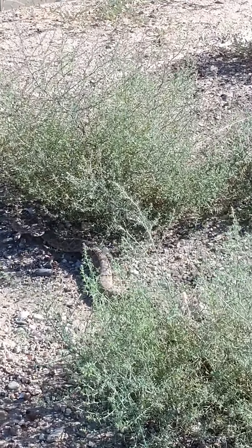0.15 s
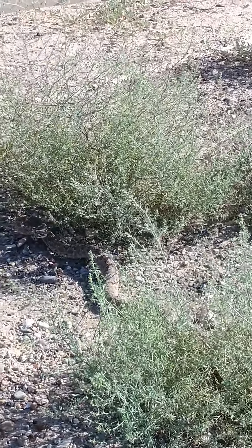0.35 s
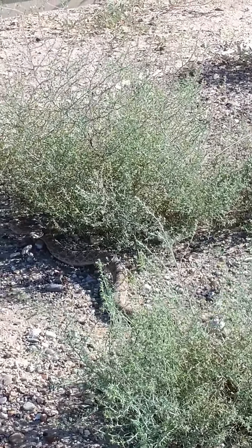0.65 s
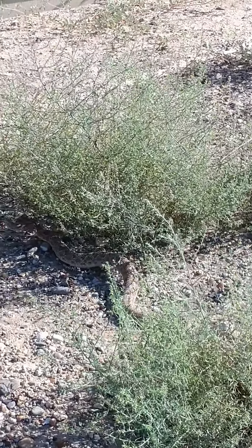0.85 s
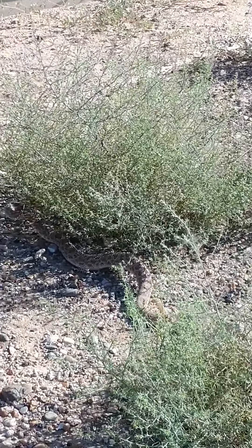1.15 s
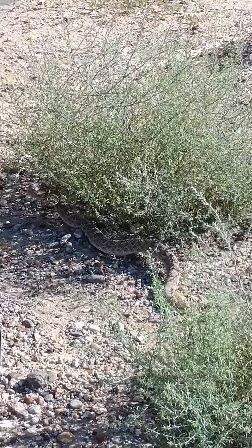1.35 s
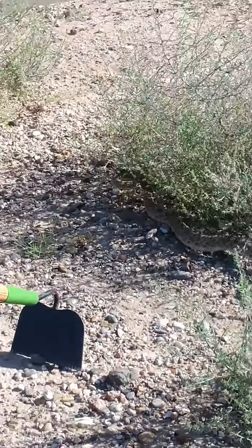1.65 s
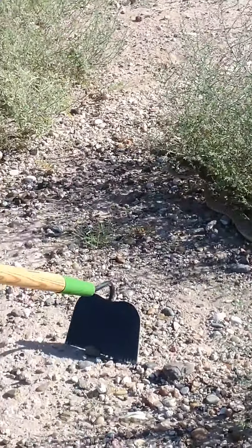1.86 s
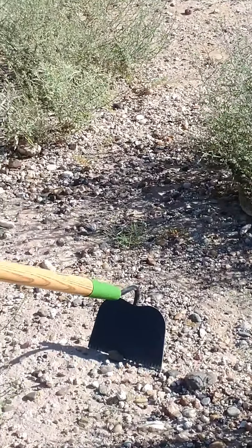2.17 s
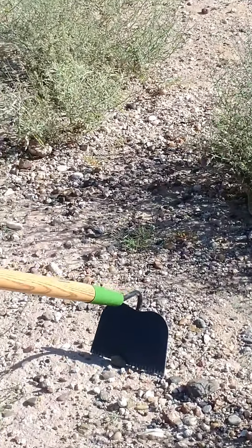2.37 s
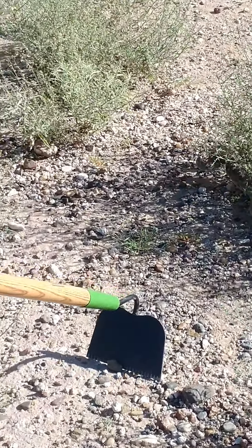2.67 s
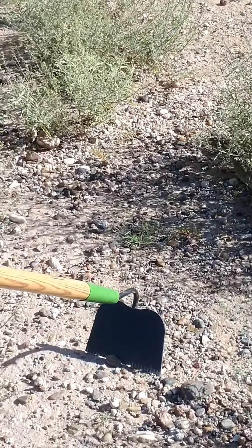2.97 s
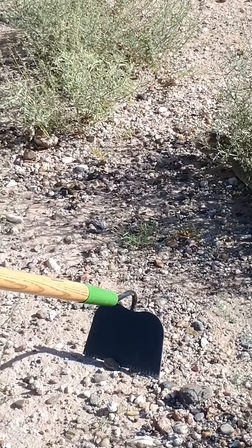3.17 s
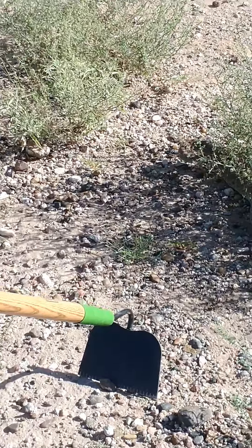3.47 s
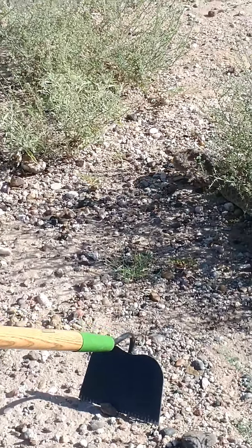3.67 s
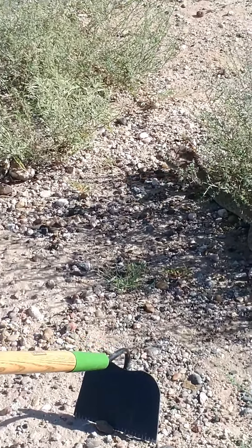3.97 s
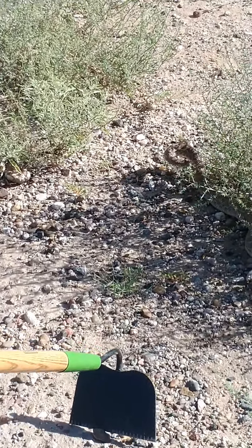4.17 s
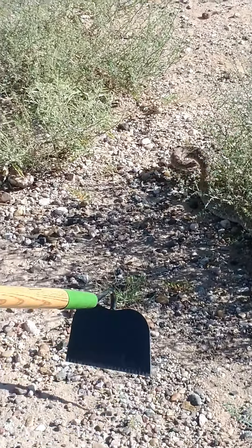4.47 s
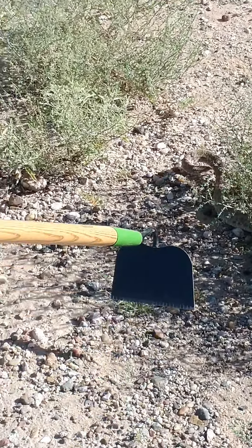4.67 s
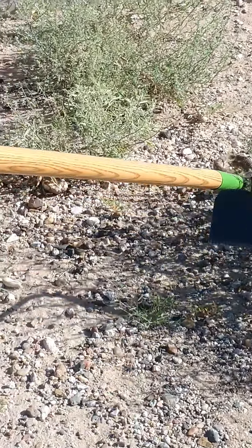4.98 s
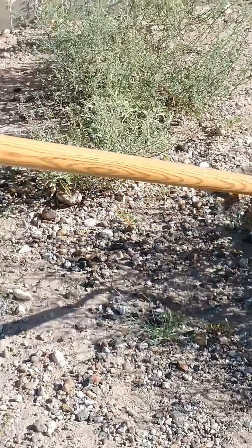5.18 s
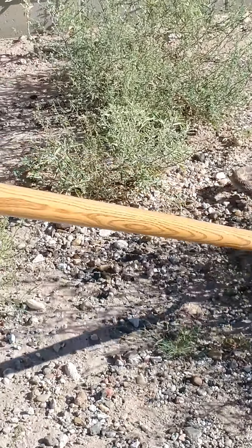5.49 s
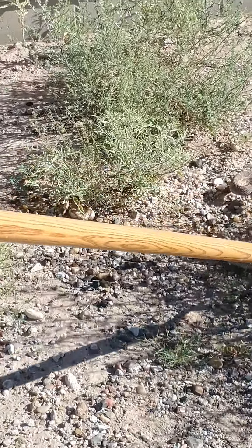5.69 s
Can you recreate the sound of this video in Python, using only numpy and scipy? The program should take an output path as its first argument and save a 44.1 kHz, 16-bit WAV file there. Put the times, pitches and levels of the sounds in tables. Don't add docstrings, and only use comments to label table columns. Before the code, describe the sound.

Continuous bright, sizzling snake rattle outdoors, rising and dipping in strength, with small pebble knocks, soft thuds and faint grit underfoot.

```python
import sys
import numpy as np
from scipy import signal
from scipy.fft import rfft, irfft, next_fast_len
from scipy.io import wavfile
from scipy.ndimage import uniform_filter1d

SR = 44100
rng = np.random.default_rng(int(sys.argv[2]) if len(sys.argv) > 2 else 0)


def how_loud(loudness_db):
    steps = np.asarray(loudness_db, float) / 20
    return 10 ** steps


def file_out(sig):
    cols = np.atleast_2d(sig).T
    lim = np.clip(cols, -1, 1)
    pcm = np.round(lim * 32767).astype(np.int16)
    wavfile.write(sys.argv[1], SR, pcm)


N = 257390
T = np.arange(N) / SR

SNAKE_LAG = 10
EDGE_LAG = 3
PAN_DB = 5.5


def unit(x):
    return x / np.sqrt(np.mean(x ** 2))


def band(x, hz, width, order=1):
    edges = [max(hz - width / 2, 20), min(hz + width / 2, 0.49 * SR)]
    return signal.sosfilt(signal.butter(order, edges, "band", fs=SR, output="sos"), x)


def high_pass(x, order, hz):
    return signal.sosfilt(signal.butter(order, hz, "high", fs=SR, output="sos"), x)


def ring(x, modes):
    out = 0
    for k, (hz, width, db) in enumerate(modes):
        out = out + (-1) ** k * how_loud(db) * band(x, hz, width)
    return out


def walk(rate):
    hold = int(SR / rate)
    steps = np.repeat(rng.standard_normal(N // hold + 1), hold)
    return 1.97 * uniform_filter1d(uniform_filter1d(steps, hold), hold)[:N]


def late(x, samples):
    return np.concatenate([np.zeros(samples), x[:N - samples]])


def curve(table):
    return np.interp(T, *np.transpose(table))


def arch(start, length):
    return np.sin(np.pi * np.clip((T - start) / length, 0, 1))


def swells(rows, rest_db):
    gain = how_loud(rest_db)
    for start, length, db in rows:
        gain = gain + how_loud(db) * np.sqrt(abs(arch(start, length)))
    return gain


def grains(spread_db):
    size = np.minimum(rng.exponential(size=N), 6)
    return unit(rng.standard_normal(N) * how_loud(spread_db * size))


def lifted(x, rise_hz):
    analytic = signal.hilbert(x, next_fast_len(N))[:, :N]
    return np.real(analytic * np.exp(2j * np.pi * np.cumsum(rise_hz) / SR))


def scatter(x, wet_db, decay_s, count=14):
    out, t, hop = np.zeros(2 * N), np.arange(700) / SR, N // count + 1
    present = rng.random((count + 1, 700)) < 1 / 8
    echoes = rng.standard_normal((count + 1, 700)) * present * np.exp(-t / decay_s)
    padded = np.pad(x, (hop, 2 * hop))
    fade = np.sin(np.pi * np.arange(2 * hop) / (2 * hop))
    for k, echo in enumerate(echoes):
        stretch = fade * padded[k * hop:(k + 2) * hop]
        piece = signal.oaconvolve(stretch, echo / np.sqrt(np.sum(echo ** 2)))
        out[k * hop:][:len(piece)] += piece
    wet = late(out[hop:hop + N], samples=30)
    return (x + how_loud(wet_db) * wet) / np.sqrt(1 + how_loud(2 * wet_db))


def segments(swing, modes, alike, spread_db, flicker_db, lag):
    shared, left, right = (unit(ring(swing * grains(spread_db), modes)) for _ in range(3))
    own = np.sqrt(1 - alike) * np.array([left, right])
    delayed = shared[np.maximum(np.arange(N) - lag, 0)]
    common = np.sqrt(alike) * np.array([delayed, shared])
    return how_loud(flicker_db * walk(14)) * (common + own)


def tail_swing():
    # t/s, f/Hz (turns per second)
    tail_rate = [(0, 152), (.8, 147), (1.7, 150), (2.9, 144), (3.4, 148), (4.1, 139), (4.6, 152),
                 (5.1, 158), (5.84, 152)]
    turns = np.cumsum(curve(tail_rate) * (1 + 0.012 * walk(30))) / SR
    force_db = 0.7 * rng.standard_normal(N // 100)[turns.astype(int)]
    return how_loud(2.2 * np.cos(2 * np.pi * turns) + 0.6 * np.cos(np.pi * turns) + force_db)


def falters():
    # t/s, level/dB, half length/s
    lapses = [(0.927, -1.5, 0.09), (1.06, -4.5, 0.053), (1.34, -1, 0.088), (2.467, -0.5, 0.043),
              (2.63, -1.5, 0.061), (4.138, -15.5, 0.01), (4.17, -6, 0.0053), (4.172, -8, 0.0021),
              (4.68, -2.5, 0.02), (5.245, 4, 0.0047), (5.269, -8.5, 0.011), (5.362, 4.5, 0.0052),
              (5.393, -7, 0.01), (5.534, -10, 0.013), (5.598, -8, 0.012), (5.66, -8.5, 0.087),
              (5.687, -15.5, 0.0033), (5.74, -2, .006), (5.77, -3, 0.0071), (2.935, 2.5, 0.013),
              (3.758, 2, 0.03), (3.8, -5, 0.0044), (5.462, -1.5, 0.033)]
    total_db = 0.6 * walk(20)
    for at, db, half in lapses:
        stretch = np.where(T > at, 1.72, 1)
        total_db = total_db + db * np.exp(-((T - at) / half / stretch) ** 2)
    return total_db


def stone_echo(shell):
    # t/s, share/1
    stone_share = [(0, .2), (.5, .33), (.85, .3), (1.0, .06), (5.84, .04)]
    echo, gap = curve(stone_share), int(0.001375 * SR)
    bounce = np.array([late(port, gap) + 0.7 * late(port, 2 * gap) for port in shell])
    return (shell + echo * bounce) / np.sqrt(1 + 2.0 * echo ** 2)


def shell_ring(swing, effort_db, extra_db, side):
    # f/Hz, width/Hz, level/dB
    main_modes = [(5050, 450, -10), (5370, 230, 0), (5760, 480, -8), (6450, 500, -18)]
    # f/Hz, width/Hz, level/dB
    deep_modes = [(4197, 350, -5), (4510, 340, 0.5), (4860, 404, 3.5), (5870, 70, 4)]
    # t/s, length/s, level/dB
    whips = [(-.1, 0.4, -50.5), (.2, 0.75, -47), (.66, 0.19, -57.5), (3.4, 0.31, -54.5),
             (3.98, 0.39, -58.5), (4.17, 0.48, -51.5), (4.69, 0.14, -58), (4.82, 0.42, -46.5),
             (5.38, 0.14, -52.5), (5.54, .06, -65), (5.7, 0.23, -64)]
    # t/s, rise f/Hz
    tightening = [(0, 111), (.85, 81), (1.0, -20.5), (2.0, 10.5), (3.1, 40.5), (3.5, 129.5), (4.7, 111),
                  (5.3, 60.5), (5.84, -3.5)]
    # from t/s, to t/s
    turned = (.9, 3.3)
    lag = SNAKE_LAG + ((T > turned[0]) & (T < turned[1]))
    pan_db = PAN_DB + 0.036 * extra_db - 0.34 * walk(4.2)
    main = lifted(segments(swing, main_modes, 0.92, 1.0, 0.13, lag), curve(tightening))
    deep = swells(whips, -66) * how_loud(1.8 * side) * segments(swing, deep_modes, 0.83, 1.5, 0.89, lag)
    shell = high_pass(how_loud(effort_db + pan_db * side) * main + deep, 11, 3950)
    return np.array([scatter(port, -12, 0.004) for port in stone_echo(shell)])


def treble_clatter(swing, extra_db, side):
    # f/Hz, width/Hz, level/dB
    edge_modes = [(6420, 510, 5), (7610, 200, 6), (7960, 1370, -3), (9056, 930, -13)]
    # f/Hz, width/Hz, level/dB
    sizzle_modes = [(10000, 2900, -7), (12800, 650, -4), (14440, 1200, -0.5), (14900, 660, -8)]
    # f/Hz, width/Hz, level/dB
    tip_modes = [(5960, 630, 2), (6850, 1800, -27)]
    # t/s, edge level/dB
    facing = [(0, -54), (.8, -54.5), (1.3, -54.5), (2.2, -52), (4.0, -52.5), (4.8, -52), (5.24, -53),
              (5.28, -58), (5.84, -52.5)]
    # t/s, length/s, level/dB
    tilts = [
        (.2, 0.28, -50.5),
        (.72, 0.15, -50.5),
        (1.0, 0.33, -50),
        (1.45, 0.27, -54),
        (2.2, 1.0, -58),
        (3.4, 0.57, -50),
        (3.8, 0.32, -47.5),
        (4.45, 0.57, -45),
        (5.7, .25, -58),
    ]
    # f/Hz, width/Hz, share/1
    case_dips = [(7520, 240, 0.66), (11370, 1300, 0.53), (6060, 170, 0.21)]
    facing_db = curve(facing)
    edge_db = facing_db + 0.52 * extra_db
    sizzle_db = facing_db - 11.5 + 0.068 * extra_db
    edge = how_loud(edge_db - 4.4 * side) * segments(swing, edge_modes, 0.57, 1.5, 0.56, EDGE_LAG)
    sizzle = how_loud(sizzle_db - 4.6 * side) * segments(swing ** 0.6, sizzle_modes, 0.75, 1.4, 0.6, lag=8)
    tip = swells(tilts, -72.5) * segments(swing, tip_modes, 0.43, 0.66, 0.88, EDGE_LAG)
    treble = high_pass(edge + sizzle + tip, 3, 6200)
    treble = np.array([scatter(port, -8, 0.004) for port in treble])
    for hz, width, share in case_dips:
        treble = treble - share * band(treble, hz, width)
    return treble


def rattle():
    # t/s, shell ring level/dB
    effort = [(.08, -42.5), (.3, -50), (.5, -42), (.8, -40.5), (.88, -51.5), (1.2, -50), (1.55, -46),
              (1.76, -50), (2.6, -48.5), (3.3, -44), (3.65, -40.5), (3.93, -52.5), (4.08, -42),
              (4.8, -39.5), (5.25, -43), (5.28, -48.5), (5.72, -53.5), (5.84, -53)]
    effort_db = curve(effort)
    extra_db = effort_db + 46
    side = np.array([[0.5], [-0.5]])
    swing, falter_db = tail_swing(), falters()
    shell = how_loud(falter_db + 2.5) * shell_ring(swing, effort_db, extra_db, side)
    return shell + how_loud(0.76 * falter_db + 4.0) * treble_clatter(swing, extra_db, side)


def scuffs(grit):
    # t/s, length/s, level/dB, centre f/Hz
    slides = [(-.1, 0.3, -75.5, 242), (0.567, 0.49, -76.5, 243), (0.685, 0.02, -63, 630),
              (1.217, 0.09, -59.5, 830), (1.293, 0.061, -65, 860), (1.486, 0.21, -68, 780),
              (2.821, 0.059, -65, 1570), (3.11, 0.82, -68.5, 1500), (4.106, 0.017, -66, 1210),
              (4.281, 0.044, -53, 1220), (4.352, 0.059, -70, 1480), (4.399, 0.068, -61, 1040),
              (4.836, 0.059, -67, 1950), (5.193, 0.095, -57, 1070), (5.275, 0.037, -67, 1380),
              (5.757, 0.015, -67, 1920)]
    out = np.zeros(N)
    for at, length, db, hz in slides:
        out += how_loud(db) * arch(at, length) * unit(band(grit, hz, 0.43 * hz))
    return out


def trickling_sand():
    # t/s, level/dB
    shuffle = [(0, -77), (.3, -101), (1.45, -74), (2.25, -78), (2.9, -72.5), (3.9, -82.5), (4.6, -74.5),
               (5.05, -87), (5.84, -85)]
    return how_loud(curve(shuffle) + 3.5 + 0.15 * walk(42)) * unit(band(grains(5.4), 1400, 1680))


def brushing_stems():
    # t/s, length/s, level/dB
    brushes = [
        (.8, 0.69, -71),
        (1.8, 1, -96),
        (3.1, 0.39, -84),
        (5.33, 0.18, -74),
    ]
    rustle = unit(band(grains(3.0), 3230, 970, order=2))
    return swells(brushes, -78) * how_loud(0.5 + 1.5 * walk(9)) * rustle


def air():
    # f/Hz, level/dB
    air_shape = [(20, -47), (35, -25), (60, 2.5), (100, -0.5), (200, -0.5), (290, -6.5), (400, -14),
                 (1000, -13.5), (2200, -17.5), (3300, -7), (4200, -4), (6000, -39)]
    hz = np.maximum(np.arange(N // 2 + 1) * SR / N, 1)
    shape_hz, shape_db = np.transpose(air_shape)
    shape = how_loud(np.interp(np.log(hz), np.log(shape_hz), shape_db))
    mid, side = rfft(rng.standard_normal((2, N)))
    apart = np.clip(0.31 + hz / 2600, 0, 0.8)
    both = irfft(shape * (mid + apart * side * np.array([[1], [-1]])), N)
    return unit(both) * how_loud(-67.5 + 0.9 * walk(7))


def motors():
    # from t/s, to t/s, f/Hz, level/dB
    engines = [
        (-.2, 2.2, 91.5, -82),
        (2.6, 4.8, 91.5, -82),
        (1.8, 4.8, 156, -82),
        (.5, 1.4, 226, -83),
        (3.4, 5.3, 213, -85),
        (4.6, 6, 118.4, -82),
    ]
    out = 0
    for start, end, hz, db in engines:
        swell = arch(start, end - start) ** 0.5
        phase = 2 * np.pi * np.cumsum(hz * (1 + 0.015 * walk(3))) / SR
        out = out + how_loud(db + 3 + 1.8 * walk(8)) * swell * np.sin(phase)
    return out


def clacks():
    # t/s, peak level/dB, f/Hz
    hard_clacks = [(0.0266, -37, 5530), (0.0455, -28, 5490), (0.077, -21, 5530), (0.3965, -33, 5170),
                   (0.4823, -26, 5140), (0.6608, -24, 4960), (0.714, -29, 5200), (1.1712, -33.5, 5500),
                   (1.589, -33, 5400), (1.9026, -35, 5200), (2.1395, -34, 5250), (2.2732, -31, 5400),
                   (2.3615, -31.5, 5300), (2.4006, -31, 5420), (2.872, -31, 5430), (2.9296, -32, 5360),
                   (3.0114, -33, 5390), (3.1153, -31, 5320), (3.1934, -30, 5340), (3.3877, -35, 5200),
                   (3.4206, -27, 5550), (3.471, -37, 5600), (3.5049, -32, 5300), (3.5564, -29, 5500),
                   (3.5947, -32, 5470), (3.6227, -35, 5570), (3.7465, -26, 5460), (3.788, -37.5, 5600),
                   (3.811, -32, 5800), (3.9726, -34, 5910), (3.9988, -31, 5480), (4.0223, -26, 5740),
                   (4.0711, -32, 5650), (4.1123, -24, 5670), (4.1495, -36, 5700), (4.169, -28, 5630),
                   (4.2128, -31, 5500), (4.2567, -28, 5680), (4.4275, -30, 5250), (4.5523, -31, 5400),
                   (4.635, -24, 5380), (4.7017, -31, 5200), (4.7401, -30, 5360), (4.79, -22, 5580),
                   (4.8549, -33, 5030), (4.8905, -31, 5430), (4.9285, -20.5, 5390), (4.975, -34, 5440),
                   (5.0739, -30, 5640), (5.1537, -29, 5260), (5.176, -27, 5120), (5.245, -33, 5400),
                   (5.3398, -37, 5370), (5.3652, -37, 5400), (5.4215, -44, 5660), (5.4765, -40, 5030)]
    out, t = np.zeros(N + 400), np.arange(400) / SR
    for at, db, hz in hard_clacks:
        envelope = np.exp(-(t / 0.0015 - 1.6) ** 2)
        out[int(at * SR):][:400] += how_loud(db - 5.5) * envelope * np.sin(2 * np.pi * hz * t)
    ping = out[:N]
    return np.array([how_loud(PAN_DB / 2) * late(ping, SNAKE_LAG), how_loud(-PAN_DB / 2) * ping])


def hoe():
    # t/s, peak level/dB
    jolts = [
        (.042, -58.5),
        (.674, -62.5),
    ]
    # f/Hz, level/dB, t60/s
    hoe_modes = [
        (630, 0, 0.061),
        (1440, 1, 0.17),
        (1560, 12.5, 0.11),
    ]
    at, peak_db = np.array(jolts).T[:, :, None]
    age = np.maximum(T - at, 0)
    ringing = 0
    for hz, db, t60 in hoe_modes:
        ringing = ringing + how_loud(db - 60 * age / t60) * np.sin(2 * np.pi * hz * age)
    struck = how_loud(peak_db) * (1 - np.exp(-age / 0.003)) * ringing
    return np.sum(struck, axis=0) * how_loud(2.5 * walk(62.0))


def shaft_hums(grit):
    # t/s, length/s, level/dB, f/Hz
    hums = [
        (0.675, 0.05, -69.5, 630),
        (.68, .04, -68, 1540),
        (1.22, 0.092, -70, 650),
        (5.228, 0.17, -76, 620),
    ]
    out = np.zeros(N)
    for at, length, db, hz in hums:
        out += how_loud(db) * arch(at, length) * unit(band(grit, hz, 58))
    return out


def thuds():
    # t/s, peak level/dB, f/Hz
    blows = [(1.018, -66, 610), (1.443, -51, 520), (1.557, -42, 417), (1.664, -62, 530), (3.303, -69, 700),
             (4.052, -51.5, 500), (4.2, -54, 770), (4.118, -59, 600), (4.3, -75, 500), (4.557, -58, 605),
             (5.25, -48, 337)]
    out = np.zeros(N)
    for at, db, hz in blows:
        age = np.maximum(T - at, 0)
        out += how_loud(db) * np.sin(2 * np.pi * hz * age) * np.exp(-age * hz)
    return out


def skitters(count=5):
    # t/s, length/s, peak level/dB, crack over knock level/dB
    runs = [
        (1.678, 0.29, -65.5, -6.5),
        (2.01, 1, -69, 4),
        (3, 0.32, -55.5, -14),
        (3.329, 0.34, -49.5, -28),
        (4.274, 0.11, -47, -20),
        (4.453, 0.086, -62.5, -11),
        (4.828, 0.062, -56, -6),
        (5.195, 0.12, -65, 0),
    ]
    rows = []
    for at, length, db, crack_db in runs:
        for place in rng.random(count):
            size, tone = rng.standard_normal(2)
            rows.append((at + length * place, db + size, 1190 * (1 + np.tanh(tone) / 10), crack_db))
    return rows


def pebbles():
    # t/s, peak level/dB, f/Hz, crack over knock level/dB
    single_pebbles = [(1.019, -47.5, 1071, -9), (1.233, -45, 990, 5), (1.443, -44.5, 1230, -23),
                      (1.528, -48.5, 905, -23.5), (1.55, -49, 955, -20), (1.558, -35, 815, -36),
                      (1.571, -43, 716, -16), (1.595, -49, 1000, -23), (1.608, -53.5, 1000, -23),
                      (1.666, -45, 950, -33), (1.814, -56, 1610, -22), (1.882, -44.5, 860, -0.5),
                      (1.912, -45, 1130, -13), (2.496, -47.5, 1078, -15), (2.861, -46.5, 1460, -22),
                      (3.304, -38.5, 1110, -36), (3.402, -48.5, 1320, -13), (3.52, -42.5, 1330, -27),
                      (3.601, -45, 1470, -4), (4.054, -40.5, 970, 3), (4.203, -47, 1140, -16),
                      (4.3, -32, 1073, -3), (4.307, -31.5, 1240, 0), (4.278, -53, 1100, -10),
                      (4.29, -54, 1300, -6), (4.312, -39, 1236, 2), (4.347, -33.5, 1260, -3),
                      (4.362, -30, 1300, -6), (4.37, -32, 1200, -16), (4.378, -43, 1300, -6),
                      (4.408, -54, 1500, -8), (4.449, -47.5, 1370, -17), (4.557, -51, 1340, -10),
                      (4.575, -56, 1500, -8), (4.61, -44, 1450, 14), (4.657, -44, 1960, 9),
                      (4.679, -42, 1970, 11), (4.733, -55, 1510, -5), (4.854, -44, 1650, 0.5),
                      (4.861, -43, 1770, 4), (4.917, -44.5, 1850, -4.5), (5.235, -46.5, 1510, 1)]
    out, t = np.zeros((2, N + 800)), np.arange(800) / SR
    push = (1 - np.exp(-t / 0.0003)) * np.exp(-t / 0.0017)
    for at, db, hz, crack_db in list(single_pebbles) + skitters():
        dull, bright = rng.standard_normal((2, 800))
        knock = np.sin(2 * np.pi * hz * t) + 0.38 * unit(band(dull, hz, hz))
        crack = how_loud(crack_db) * unit(band(bright, 3980, 3900, order=2))
        knock = push * (knock + crack)
        by_hoe = int(hz < 1075)
        out[by_hoe, int(at * SR):][:800] += how_loud(db) * knock / np.max(abs(knock))
    return out[:, :N]


def boots():
    grit = grains(4.7)
    by_boots, by_hoe = pebbles()
    by_hoe = by_hoe + hoe() + thuds() + shaft_hums(grit)
    by_hoe = band(by_hoe, 2100, 3800, order=2)
    by_boots = by_boots + scuffs(grit) + trickling_sand() + brushing_stems()
    left = by_boots + 0.4 * band(by_boots, 1350, 1200) + by_hoe
    right = late(by_boots, 20) + 1.1 * late(by_hoe, 12)
    return np.array([left, right])


def scene():
    return rattle() + boots() + air() + motors() + clacks()


def top_cut(x):
    return signal.sosfilt(signal.butter(12, 15730, fs=SR, output="sos"), x)


def record(dry):
    low_pass = signal.ellip(8, 0.2, 70, 15700, fs=SR, output="sos")
    mix = signal.sosfilt(low_pass, dry)
    return top_cut(mix)


dry = scene()
out = record(dry)
file_out(out)
```